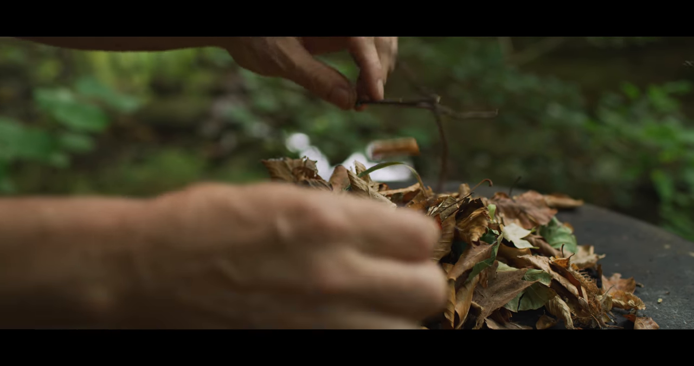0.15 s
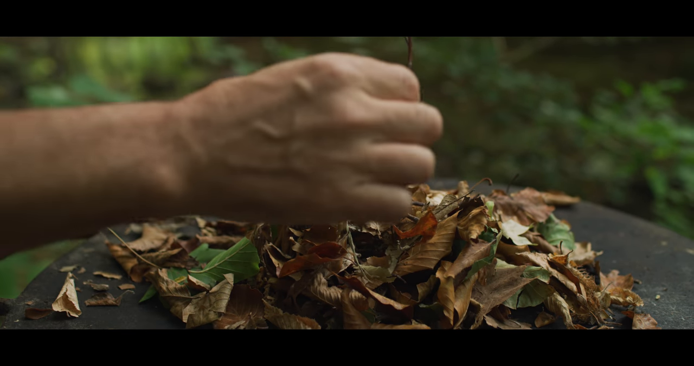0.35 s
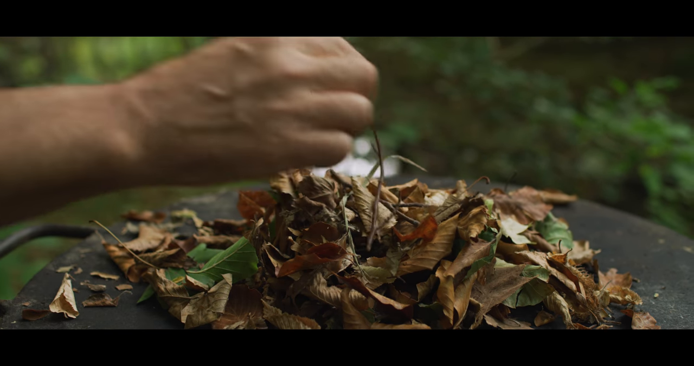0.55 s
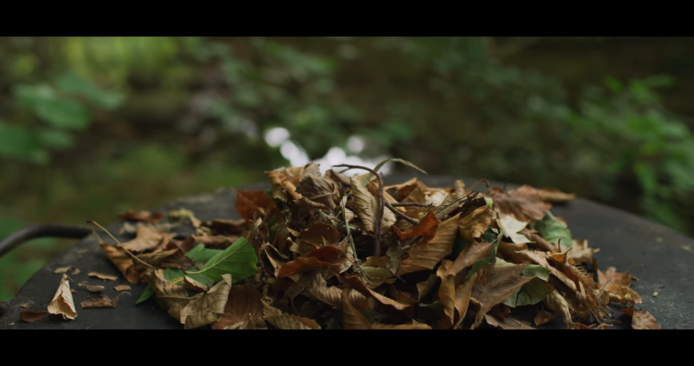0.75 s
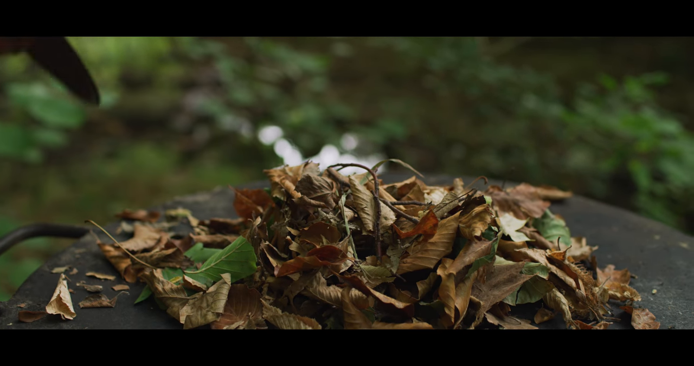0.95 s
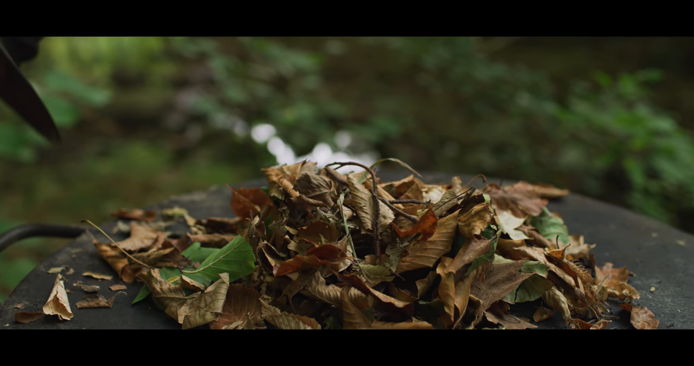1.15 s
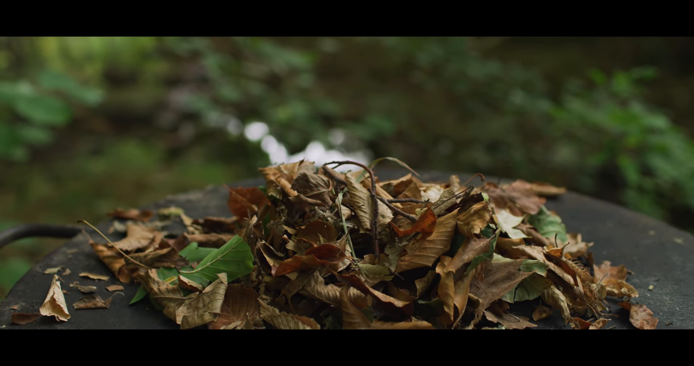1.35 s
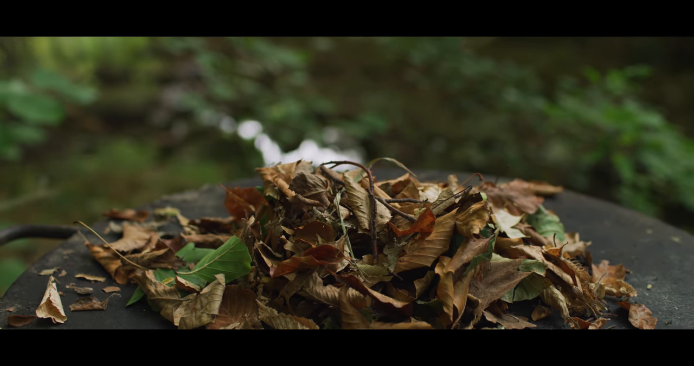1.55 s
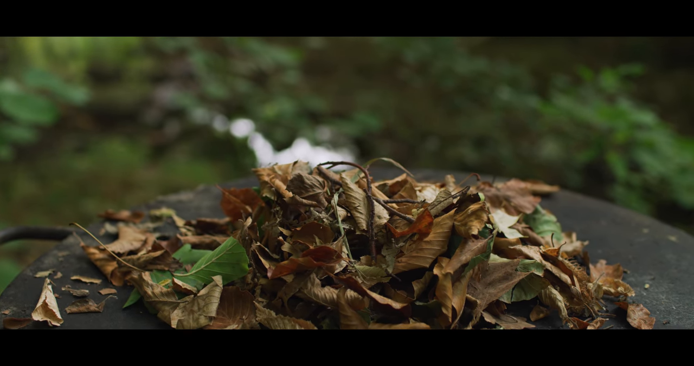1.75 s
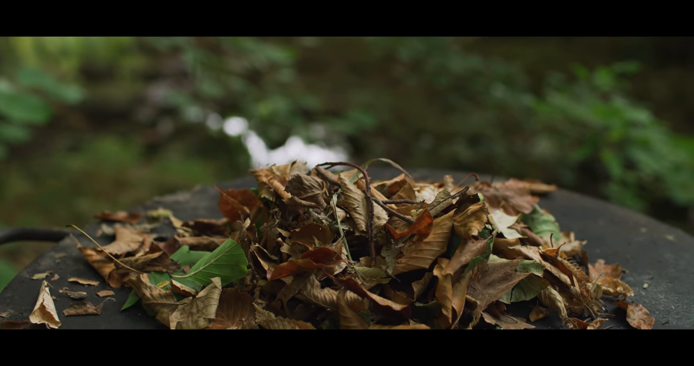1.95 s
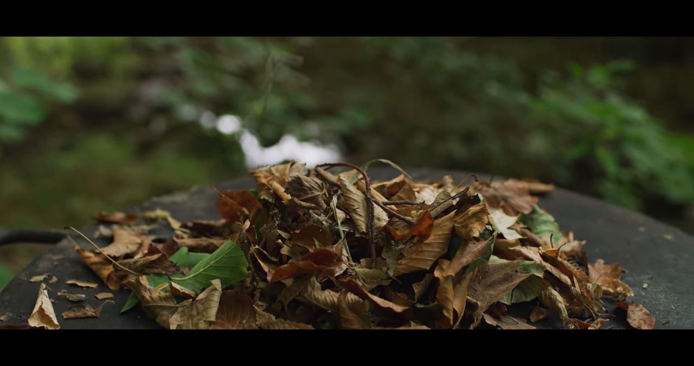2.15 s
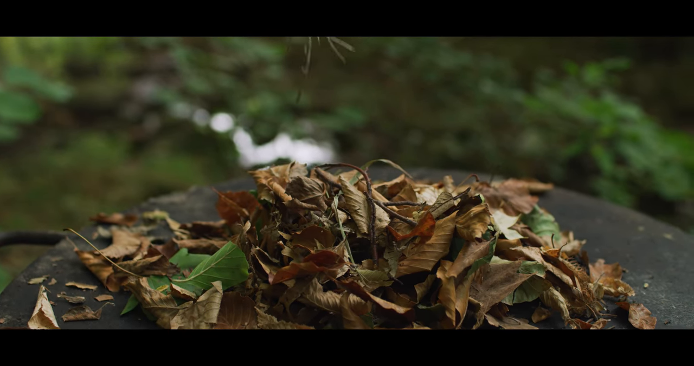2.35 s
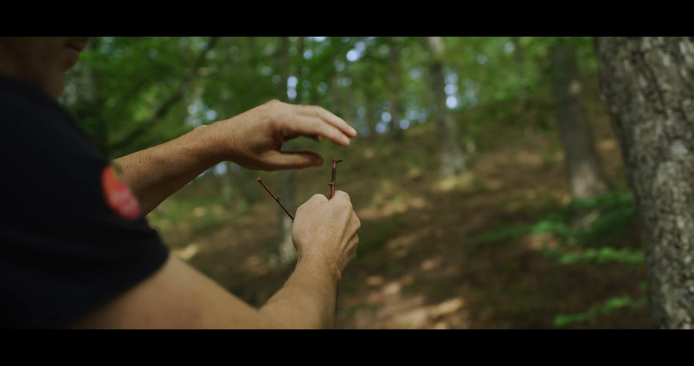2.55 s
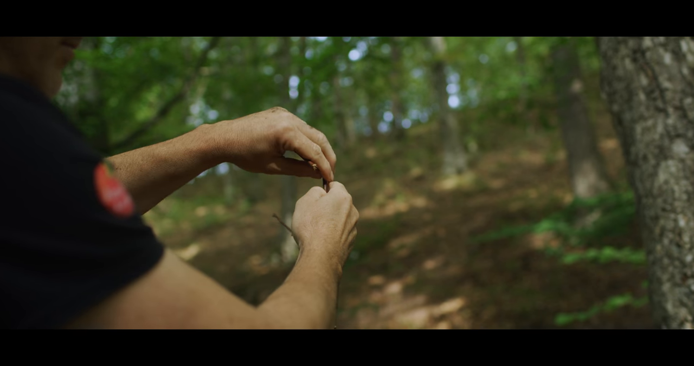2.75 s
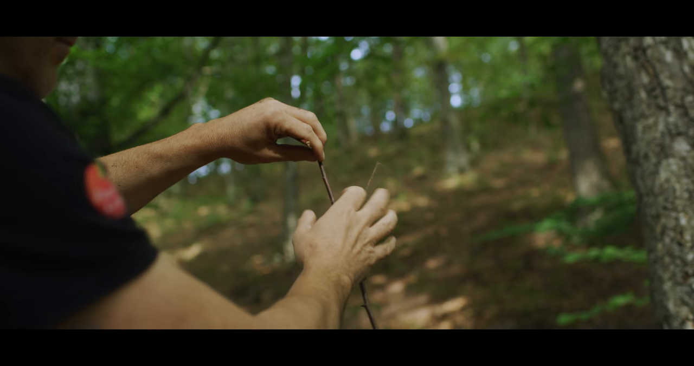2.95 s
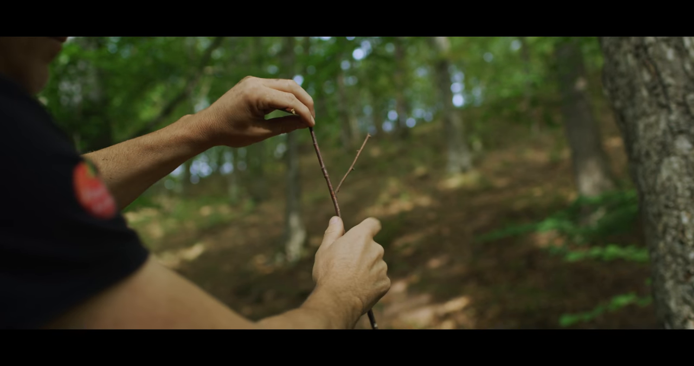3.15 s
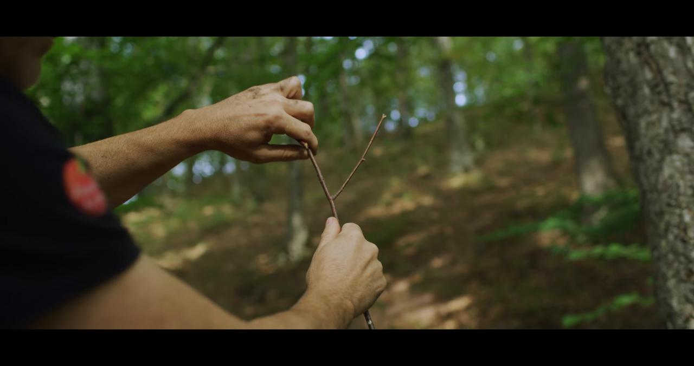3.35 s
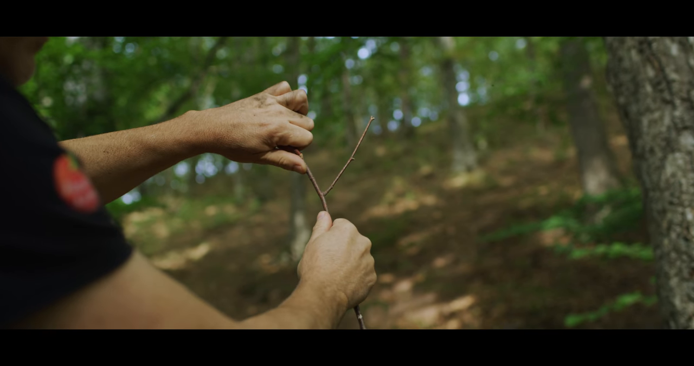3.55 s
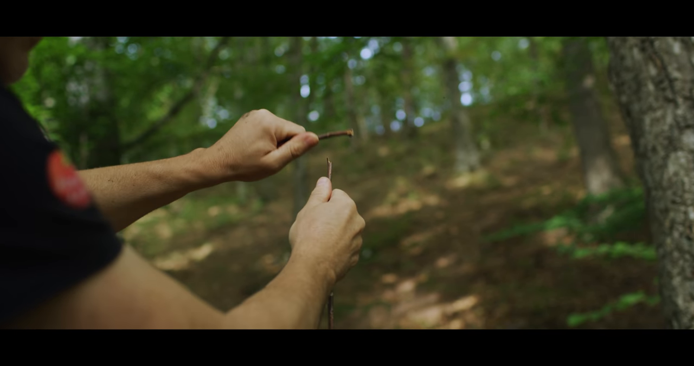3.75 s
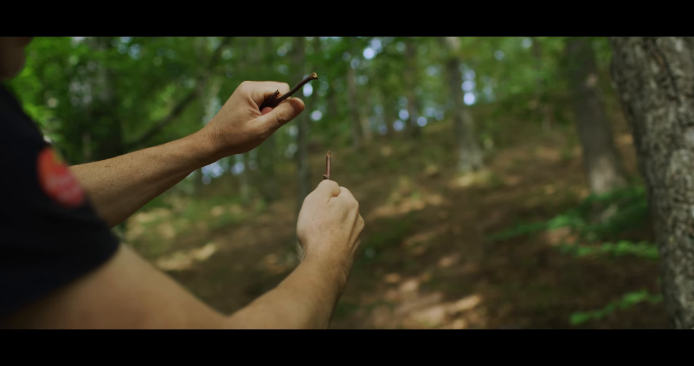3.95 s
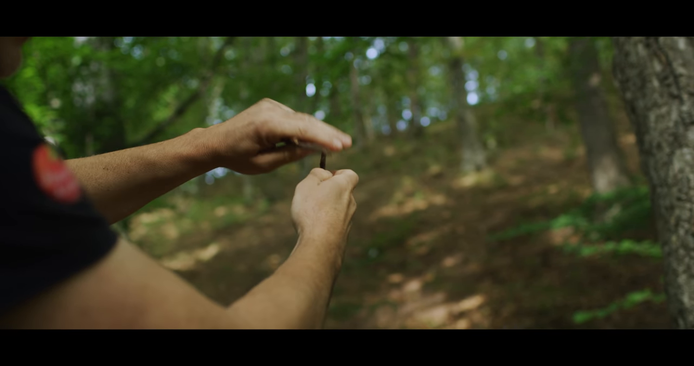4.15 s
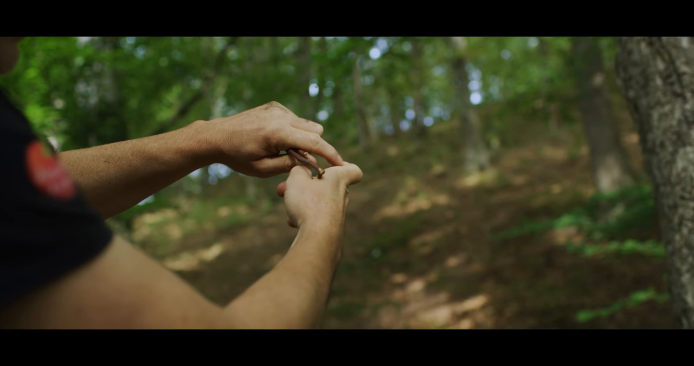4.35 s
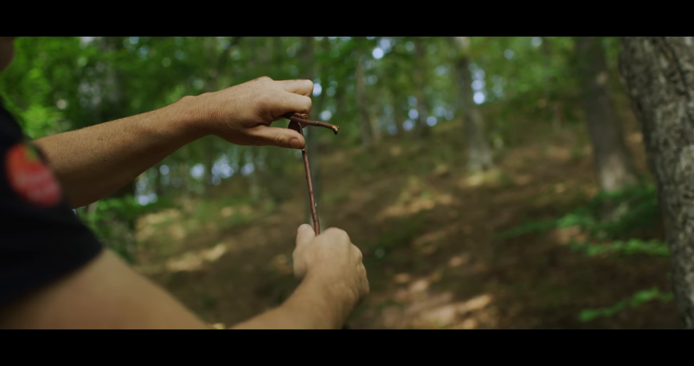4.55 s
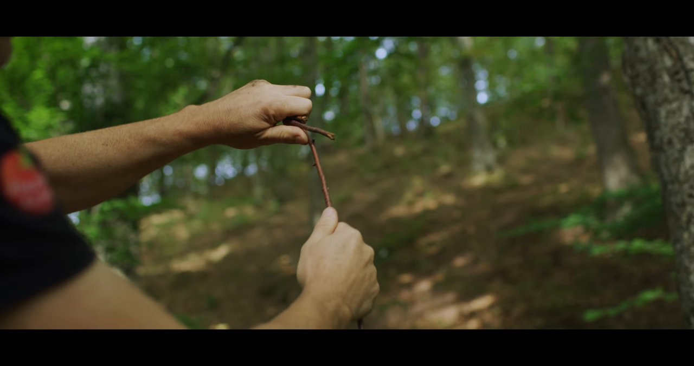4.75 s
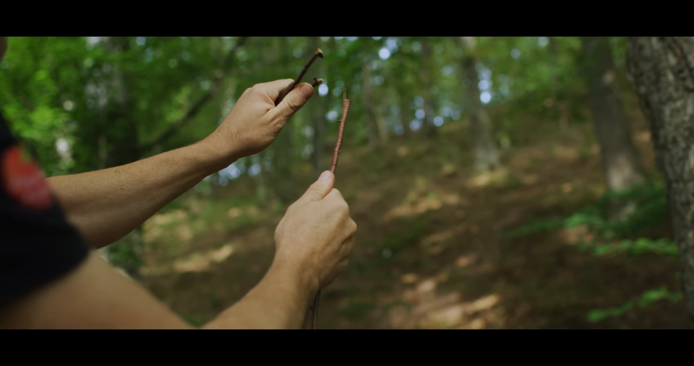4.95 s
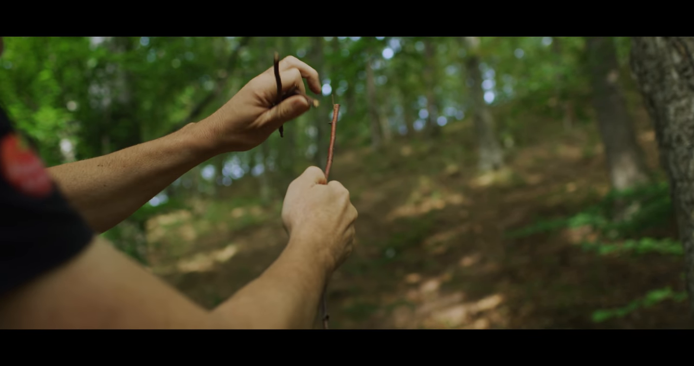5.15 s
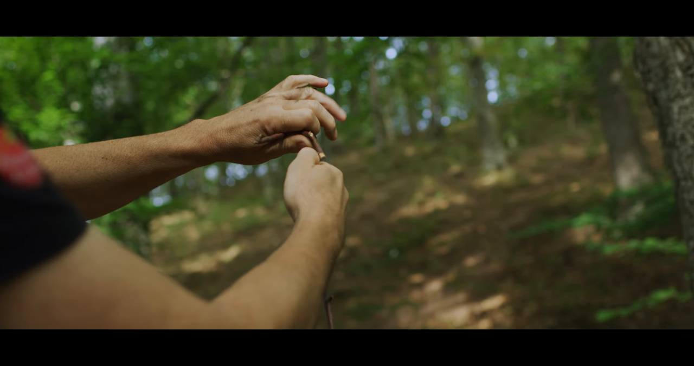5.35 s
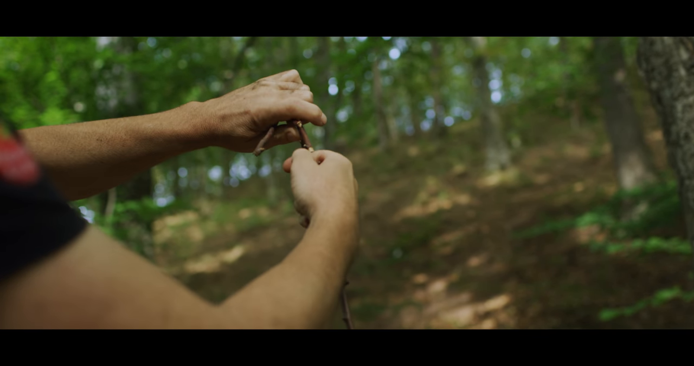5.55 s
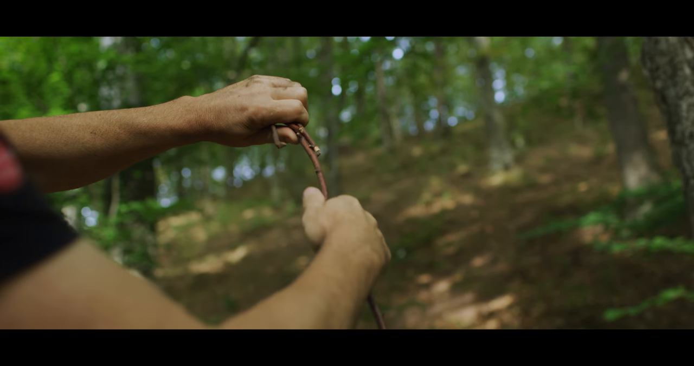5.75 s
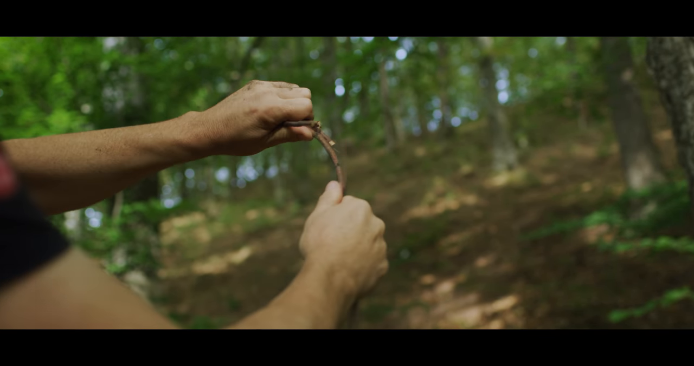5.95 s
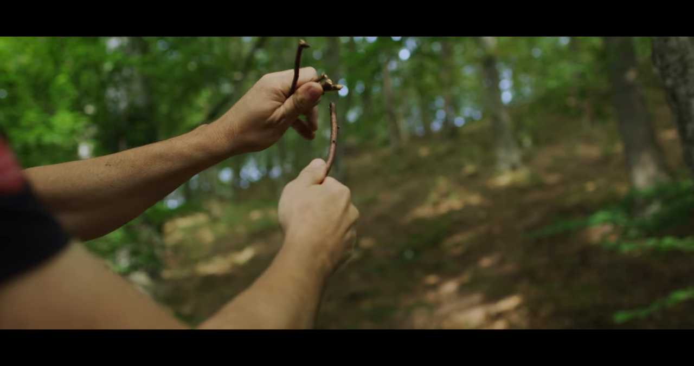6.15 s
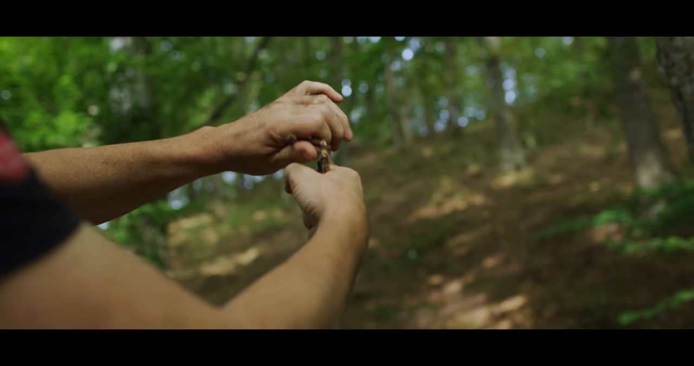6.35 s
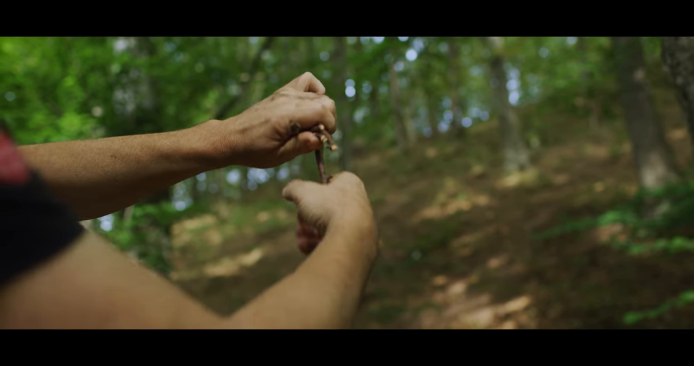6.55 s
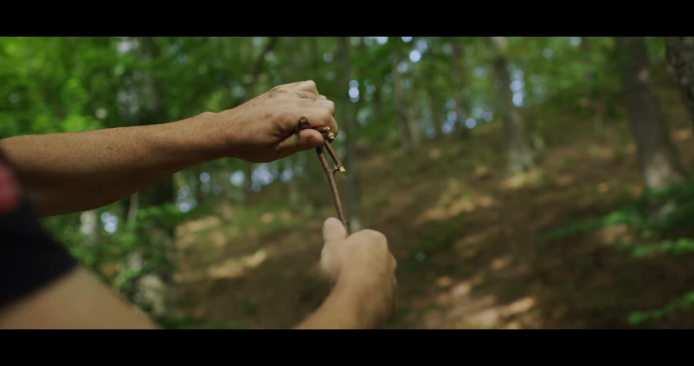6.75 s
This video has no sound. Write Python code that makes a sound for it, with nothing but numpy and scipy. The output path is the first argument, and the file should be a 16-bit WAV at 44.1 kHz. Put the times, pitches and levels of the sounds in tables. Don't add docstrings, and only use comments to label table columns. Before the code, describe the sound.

Hands rustle leaves and bark, then break five thin dry sticks with bright cracks, the last two loudest, amid birdsong and a fading river hush.

```python
import sys
import numpy as np
from scipy import signal
from scipy.fft import rfft, irfft
from scipy.io import wavfile
from scipy.ndimage import uniform_filter1d, map_coordinates

SR = 44100
rng = np.random.default_rng(int(sys.argv[2]) if len(sys.argv) > 2 else 0)


def gain_from_db(level_db):
    decades = np.asarray(level_db, float) / 20
    return 10 ** decades


def wrap_up_sound(samples):
    columns = np.atleast_2d(samples).T
    tamed = np.clip(columns, -1, 1)
    steps = np.round(tamed * 32767).astype(np.int16)
    wavfile.write(sys.argv[1], SR, steps)


N = 299880

# (frequency [Hz], level [dB per Hz])
RIVER_COLOUR = [(88, -33), (150, -7), (254, -12.5), (422, 0), (583, -4.5), (1280, -0.5), (2100, -6),
                (3830, -8.5), (6000, -11), (7800, -37.5), (13200, -120)]
# (frequency [Hz], level [dB per Hz])
AIR_COLOUR = [(15, -42), (25, 1), (76, -0.5), (309, -7.5), (394, -7), (545, -6.5), (754, -6), (1940, -8.5),
              (2840, -15), (4490, -18.5), (9840, -26.5), (14800, -32.5), (16000, -47)]
# (frequency [Hz], level [dB per Hz])
LEAF_COLOUR = [(2500, -36), (5000, 3), (8000, -5), (12000, -11), (16000, -15.5)]
# (middle [s], length [s], rustle [dB])
STIRS = [(0.602, 1.1, -74), (1.378, 1.5, -70), (2.007, 1.3, -70.5), (2.396, 0.57, -75), (4.207, 0.32, -75),
         (5.594, 0.74, -75), (6.075, 0.16, -64), (6.75, 0.52, -78)]
# (frequency [Hz], bandwidth [Hz], level [dB])
RUMBLE_HUMS = [(40.95, 9.14, -72), (51.3, 10, -63.5), (103.6, 11, -69.5)]
# (frequency [Hz], level [dB per Hz])
WIDTH_COLOUR = [(30, 2.5), (90, -5.5), (300, -14), (700, -1.5), (1700, -1.5), (2800, -22.5)]
# (middle [s], length [s], rise
# [dB])
CHORUS_SWELLS = [(.1, 0.93, 2.5), (.65, 0.5, 3.5), (1.32, 0.74, 5.5), (2.7, 0.53, 2), (3.85, .4, 1),
                 (4.2, 0.25, 0.5), (4.83, 0.18, 3), (5.51, 0.17, 1.5), (6.16, 0.42, 4), (6.8, 0.33, 3)]
# (start [s], length [s], first pitch [Hz], last pitch [Hz], level [dB])
GLIDES = [(.115, .02, 4050, 4750, -56), (.133, .035, 4700, 5450, -53), (.163, .02, 5300, 6600, -54),
          (1.84, .02, 4470, 5550, -57), (2.525, .09, 4020, 3700, -63), (2.63, .035, 4700, 3600, -60),
          (2.66, .05, 3550, 4200, -64), (2.82, .07, 3800, 4900, -68), (3.125, .022, 4700, 5530, -59),
          (3.51, .035, 4550, 3700, -58), (3.55, .03, 3100, 3680, -63), (3.585, .03, 2850, 3160, -62),
          (3.805, .022, 4500, 5400, -60), (4.125, .045, 4290, 4700, -66), (4.19, .02, 7500, 7950, -60),
          (4.21, .075, 7800, 7780, -66), (4.29, .02, 7550, 8000, -61), (5.655, .045, 4450, 4050, -58),
          (6.39, .065, 6150, 5800, -62), (6.565, .025, 6100, 6290, -59), (6.675, .055, 6380, 3990, -55)]
# (start [s], length [s], pitch [Hz], level [dB])
PIPES = [
    (.19, .14, 2565, -66),
    (3.11, .22, 2165, -66),
]
# (start [s], lower voice [dB], upper voice [dB], upper voice pitch [ratio])
NEAR_CALLS = [(0.259, -45.5, -49, 1.01), (1.101, -46.5, -50, .995), (1.934, -47.5, -50, .98),
              (3.226, -44, -50, 1.005), (4.642, -43.5, -52, .995), (5.503, -43.5, -51.5, .985),
              (6.584, -44, -50, .97)]
# (time after start [s], lower voice [Hz], upper voice [Hz], effort [dB])
CALL_SHAPE = [
    (0, 2900, 5650, -14),
    (.008, 3800, 6600, -9),
    (.014, 4200, 7150, -4),
    (.022, 4370, 7480, 0),
    (.038, 4290, 7000, 0),
    (.05, 4220, 6970, -5),
    (.058, 4330, 7200, -2),
    (.062, 3600, 6600, -13),
    (.068, 2300, 5400, -19),
]
# (times lower [count], times upper [count], level [dB])
CALL_MIXED = [
    (1, 1, -15),
    (-1, 1, -17),
    (2, 0, -23),
]
# (start [s], level [dB])
CHIPS = [(0.718, -62.5), (4.369, -63), (6.2, -64)]
# (time after start [s], lower voice [Hz], upper voice [Hz], effort [dB])
CHIP_SHAPE = [
    (0, 4680, 4980, 18),
    (.004, 3725, 5280, 15),
    (.021, 3670, 5120, 8),
    (.025, 4100, 4700, 18),
    (.029, 4020, 4270, -14),
]
# (times lower [count], times upper [count], level [dB])
CHIP_MIXED = [
    (-2, 2, -8),
    (.5, .5, -7),
]
# (start [s], length [s], edge pitch [Hz], top pitch [Hz], level [dB])
ARCHES = [(1.869, 0.032, 3930, 4850, -54), (2.598, 0.041, 2750, 3180, -60),
          (3.149, 0.092, 4100, 4430, -58.5), (3.947, 0.061, 7400, 9100, -67),
          (4.062, 0.045, 7160, 9250, -67)]
# (start [s], length [s], first pitch [Hz], last pitch [Hz], level [dB])
DROPS = [(6.335, .033, 7900, 6100, -64), (6.51, 0.045, 8070, 6600, -62.5)]
# (time [s], peak [dB], ring [Hz])
RUBS = [(0.241, -46, 6420), (0.6002, -46, 6000), (0.665, -40, 7320), (1.2054, -42, 6480),
        (1.2444, -44, 6200), (1.2862, -42, 12900), (1.356, -44, 8140), (1.3876, -42, 6320),
        (1.4244, -45, 7520), (1.4676, -42, 6130), (1.5828, -50, 6040), (1.718, -47, 6780),
        (2.0702, -49.5, 6870), (2.6242, -44, 7720), (2.9253, -42.5, 6340), (2.9765, -46, 8700),
        (3.4295, -50, 10200), (3.5006, -49, 7190), (3.851, -43.5, 6000), (4.046, -42.5, 7040),
        (4.3183, -46, 6360), (5.1084, -42.5, 6040), (5.1774, -45.5, 9900), (5.3995, -37.5, 8360),
        (5.432, -42, 6190), (5.691, -44, 6400), (6.27, -43.5, 6330), (6.2997, -41.5, 9160),
        (6.4182, -41.5, 11000), (6.5588, -47, 6110)]
# (time [s], level [dB], length [s])
SCUFFS = [(0.3, -50.5, 0.064), (0.598, -46, 0.026), (0.657, -50.5, 0.016), (1.087, -52.5, 0.017),
          (1.2, -51, 0.028), (1.26, -50.5, 0.018), (1.58, -47, 0.013), (1.616, -51, 0.0095),
          (1.958, -47, 0.039), (2.056, -71, 0.029), (2.348, -60, 0.029), (2.55, -60, 0.022),
          (2.915, -56, 0.05)]
# (time [s], tearing [dB], tearing t60 [s], unringing share [dB], jolt in the hands [dB])
BREAKS = [
    (2.1524, 0.5, 0.0048, -12, -20),
    (2.2459, -11, 0.0037, -15, -28.5),
    (3.6768, 0, 0.0035, -12, -26),
    (4.8730, 10, 0.0042, -19.5, -26),
    (6.013, 10.5, 0.0067, -10.5, -18),
]
# (frequency [Hz], bandwidth [Hz], level [dB])
PIECE_1 = [(2560, 510, -17.5), (4490, 220, 0.5), (5780, 280, -4.5), (6710, 220, -9.5), (7800, 250, -13),
           (8440, 570, -10.5), (10300, 270, 7.5), (12000, 490, 5), (12500, 240, -11), (13600, 830, -5),
           (15100, 190, -10.5), (15500, 380, -16)]
PIECE_2 = [(3920, 240, -16), (4970, 100, 1), (6320, 1400, -7), (8750, 810, 5.5), (13000, 1040, -20)]
PIECE_3 = [(1307, 430, -9), (4360, 87, -12.5), (5460, 580, -5.5), (7100, 120, -5), (7270, 310, -6),
           (8350, 260, -3), (9460, 600, 4), (10200, 550, -1.5), (11600, 220, -20), (12500, 380, -5),
           (14200, 240, -9), (15980, 410, -10)]
PIECE_4 = [(2660, 510, -26), (3290, 83, -18), (4334, 290, 0), (5360, 290, -5.5), (6600, 390, -8),
           (7870, 930, -7.5), (8400, 260, -13), (9430, 320, -18), (9530, 220, -15), (11000, 220, -18.5),
           (12700, 290, -16.5), (14900, 390, -23)]
PIECE_5 = [(2780, 680, -11.5), (4750, 220, 1.5), (5940, 680, -1), (7085, 300, -0.5), (7795, 340, -1.5),
           (8580, 890, -6.5), (9150, 800, -11), (10500, 600, -3.5), (11840, 130, -14), (12540, 620, -4),
           (14700, 130, -17), (14700, 490, -9.5)]
THUMPS_HZ = [420, 700, 810, 630, 276]
GROUND_DB = [-25, -15, -14, -18, -16.5]
# (time [s], peak [dB], ring [Hz], t60 [s])
FIBRES = [(3.641, -51, 9000, 0.0055), (3.65, -45, 14000, 0.0064), (3.661, -29.5, 8970, 0.0048),
          (4.8189, -12, 10200, 0.0026), (4.8228, -18, 7500, 0.0045), (4.8506, -10, 9160, 0.001),
          (5.8525, -24, 7800, 0.004), (5.9525, -42, 9100, 0.0067), (5.960, -33, 10900, 0.0029),
          (5.9662, -30, 11600, 0.0035), (5.9745, -16.5, 13800, 0.0049), (5.9778, -48, 12100, .003),
          (5.983, -44, 12000, 0.0033), (5.9931, -13, 9000, 0.00203), (5.9988, -20.5, 12500, 0.0036),
          (6.0082, -9, 8960, 0.001), (6.1555, -32.5, 10100, 0.0093), (6.4295, -37, 5950, 0.0054),
          (6.5045, -33, 5000, 0.0036), (5.3935, -45, 12000, .004), (5.931, -44, 11000, .004)]

RIVER_NEAR_DB, RIVER_FAR_DB, TURN_START_S, TURN_END_S = -54, -64, 2.48, 3.02
AIR_DB, STILL_LEAVES_DB, CHORUS_DB = -58.5, -80.5, -60
CRACKLES_PER_S, CRACKLE_SHARE = 270, 0.38
LEAD_DB, LEAD_S, OVERTONE_DB = 13, 0.0096, -31.5
TREES_T60_S, RUB_T60_S = 0.19, 0.026
CRACK_OVER_TEARING, RING_WIDENING = 5, 1.3
KNOCK_HZ = 1550
GROUND_ECHO_S, GROUND_SMEAR_S, FLAT_GROUND = 0.0059, 0.015, 5.6


def rms_one(x):
    return x / np.sqrt(np.mean(x ** 2) + 1e-20)


def drift(rate_hz, size=N):
    knots = rng.standard_normal(size // 40 + 4)
    return rms_one(map_coordinates(knots, [np.arange(size) / SR * rate_hz + 1], order=1))


def resonate(x, hz, width_hz):
    r = np.exp(-np.pi * width_hz / SR)
    feedback = [1, -2 * r * np.cos(2 * np.pi * hz / SR), r * r]
    return signal.lfilter([(1 - r * r) / 2, 0, (r * r - 1) / 2], feedback, x)


def cut(x, hz, kind, order=2):
    return signal.sosfilt(signal.butter(order, hz, kind, fs=SR, output="sos"), x)


def add(track, s, sound):
    i = round(s * SR)
    track[i:i + len(sound)] += sound[:N - i]


def dying(t60, size):
    return rng.standard_normal(size) * gain_from_db(-60 * np.arange(size) / SR / t60)


def evened(burst):
    spectrum = rfft(burst)
    power = uniform_filter1d(abs(spectrum) ** 2, size=15)
    return irfft(spectrum / np.sqrt(power), len(burst))


def bumps(rows):
    t = np.arange(N) / SR
    return sum(height * np.cos(np.pi * np.clip((t - s) / length, -.5, .5)) ** 2 for s, length, height in rows)


def hiss(spectrum, patchy_db):
    hz, db = np.transpose(spectrum)
    log_hz = np.log(np.fft.rfftfreq(N, 1 / SR) + 1)
    colour = rfft(rng.standard_normal(N)) * gain_from_db(np.interp(log_hz, np.log(hz), db))
    region = np.interp(log_hz, np.log(hz[[0, -1]]), [0, 2])
    together = drift(12.0)
    total = np.zeros(N)
    for k in range(3):
        band = irfft(colour * np.clip(1 - abs(region - k), 0, 1), N)
        total += band * gain_from_db(patchy_db * (1.6 * together + drift(17.0)))
    return rms_one(total)


def scatter(x, t60, start_s, alike):
    mid, side = (dying(t60, size=SR // 2) for k in range(2))
    tails = np.array([mid + (1 - alike) * side, mid - (1 - alike) * side])
    late = np.pad(x, (round(start_s * SR), 0))[:N]
    return signal.fftconvolve(late[None], tails / np.sqrt(np.sum(mid ** 2)), axes=1)[:, :N]


def river():
    born = rng.random(N) < 700 / SR * gain_from_db(4.0 * drift(9.0))
    sizes = gain_from_db(2.0 * np.minimum(rng.exponential(1, N), 4)) * rng.choice([-1, 1], N) * born
    dealt = rng.integers(0, 12, N)
    bubbles = np.zeros(N)
    for k, hz in enumerate(np.geomspace(300, 2600, 12)):
        bubbles += resonate(sizes * (dealt == k) + 1e-18, hz, hz / 7.0)
    level_db = np.interp(np.arange(N) / SR, [TURN_START_S, TURN_END_S], [RIVER_NEAR_DB, RIVER_FAR_DB])
    return gain_from_db(level_db) * rms_one(hiss(RIVER_COLOUR, 1.3) + .6 * rms_one(bubbles))


def air():
    return gain_from_db(AIR_DB) * cut(hiss(AIR_COLOUR, 0.93), 34, "high")


def leaves():
    born = rng.random(N) < CRACKLES_PER_S / SR * gain_from_db(6.0 * drift(11.0))
    sizes = gain_from_db(3.0 * np.minimum(rng.exponential(1, N), 4)) * born
    crackle = signal.lfilter([1], [1, -.985], sizes) * rng.standard_normal(N)
    crackle = rms_one(cut(crackle, [5500, 14500], "band"))
    rustle = rms_one(hiss(LEAF_COLOUR, 1.8) + CRACKLE_SHARE * crackle)
    stirred = gain_from_db(STILL_LEAVES_DB) + bumps([(s, length, gain_from_db(db)) for s, length, db in STIRS])
    return gain_from_db(6.5) * stirred * rustle


def rumble():
    out = np.zeros(N)
    for hz, width, db in RUMBLE_HUMS:
        hum = resonate(resonate(rng.standard_normal(N), hz, width), hz, width)
        out += gain_from_db(db) * rms_one(hum)
    return out


def width_hiss():
    return gain_from_db(-81.5) * cut(hiss(WIDTH_COLOUR, .8), 40, "high") * [[1], [-1]]


def chorus(count=400):
    notes = np.zeros(N)
    for s, pitch, glide, length, level in rng.random((count, 5)):
        t = np.arange(0, .02 + 0.089 * length, 1 / SR)
        hz = 3100 + 2500 * pitch + 1500 * (glide - .5) * t / t[-1]
        note = np.hanning(len(t)) * np.sin(2 * np.pi * np.cumsum(hz) / SR)
        add(notes, s * N / SR, gain_from_db(16 * level) * note)
    blurred = rms_one(scatter(notes, t60=0.34, start_s=0, alike=.45))
    haze = [(1500, -32.5), (2600, -9), (4200, -2.0), (6000, -9), (9000, -16.0), (14000, -31)]
    mid, side = (hiss(haze, 0.75) for k in range(2))
    level_db = CHORUS_DB + bumps(CHORUS_SWELLS) + 1.9
    return gain_from_db(level_db) * rms_one(0.53 * blurred + mid + 0.51 * side * [[1], [-1]])


def whistle(length, hz_of, db, fade_db=0, flicker_db=3.0, unsteady=0.012):
    share = np.arange(0, length, 1 / SR) / length
    level_db = db + fade_db * (share - .5) + flicker_db * drift(61.0, size=len(share))
    window = signal.windows.tukey(len(share), .25)
    hz = hz_of(share) * (1 + unsteady * drift(256.0, size=len(share)))
    return np.sqrt(2) * gain_from_db(level_db) * window * np.sin(2 * np.pi * np.cumsum(hz) / SR)


def whistlers():
    out = np.zeros(N)
    for s, length, first, last, db in GLIDES:
        add(out, s, whistle(length, lambda share: first + (last - first) * share, db))
    for s, length, hz, db in PIPES:
        steady = lambda share: np.full_like(share, hz)
        add(out, s, whistle(length, steady, db, fade_db=-7, flicker_db=2.5, unsteady=.002))
    for s, length, edge, top, db in ARCHES:
        arch = lambda share: edge + (top - edge) * np.sin(np.pi * share ** 1.8) ** 0.72
        add(out, s, whistle(length, arch, db, fade_db=-8))
    for s, length, first, last, db in DROPS:
        add(out, s, whistle(length, lambda share: first + (last - first) * share ** 2.2, db))
    return out


def path(rows):
    s, *columns = np.transpose(rows)
    t = np.arange(s[0], s[-1], 1 / SR)
    return [np.interp(t, s, c) for c in columns] + [signal.windows.tukey(len(t), .15)]


def two_voices(shape, low_db, high_db, mixed, lead_db=0, ratio=1):
    low_hz, high_hz, effort_db, window = path(shape)
    size = len(window)
    wobble = lambda share: 1 + share * drift(300.0, size=size)
    low = 2 * np.pi * np.cumsum(low_hz * wobble(.01)) / SR
    high = 2 * np.pi * np.cumsum(ratio * high_hz * wobble(.013)) / SR
    lead_db = lead_db * np.exp(-(np.arange(size) / SR / LEAD_S) ** 2)
    tones = gain_from_db(low_db) * np.sin(low) + gain_from_db(high_db + lead_db) * np.sin(high)
    tones += gain_from_db(high_db + OVERTONE_DB + 3.0 * lead_db) * np.sin(2 * high)
    for a, b, db in mixed:
        tones += gain_from_db((low_db + high_db) / 2 + db) * np.sin(a * low + b * high)
    breath = cut(rng.standard_normal(size), [2800, 8500], "band")
    tones += gain_from_db(low_db - 11.0) * breath
    return np.sqrt(2) * tones * gain_from_db(effort_db + 2.9 * drift(110.0, size=size)) * window


def near_bird():
    out = np.zeros(N)
    for s, low_db, high_db, ratio in NEAR_CALLS:
        add(out, s, two_voices(CALL_SHAPE, low_db, high_db, CALL_MIXED, LEAD_DB, ratio))
        puff = resonate(resonate(rng.standard_normal(500), 4460, 1000), 4460, 1000) * np.hanning(500)
        add(out, s - .009, gain_from_db(low_db + 7) * puff)
    return out


def chipping_bird():
    out = np.zeros(N)
    for s, db in CHIPS:
        add(out, s, two_voices(CHIP_SHAPE, db, db - 6.5, CHIP_MIXED))
    return out


def birds():
    others = whistlers() + chipping_bird()
    near = near_bird()
    left = gain_from_db(3.0) * near + gain_from_db(2.5) * others
    right = gain_from_db(-4.5) * np.roll(near, 1) + gain_from_db(-4.0) * np.roll(others, 1)
    into_trees = gain_from_db(1.5) * near + gain_from_db(-2.0) * others
    return np.array([left, right]) + scatter(into_trees, t60=TREES_T60_S, start_s=.003, alike=0.53)


def ticks(rows, broad_db, low_hz):
    out = np.zeros(N)
    for s, db, hz, t60 in rows:
        burst = evened(dying(t60, size=1500))[:1200]
        sound = resonate(burst, hz, 0.34 * hz) + gain_from_db(broad_db) * cut(burst, low_hz, "high")
        add(out, s, gain_from_db(db) * sound / abs(sound).max())
    return out


def rubs():
    return ticks([(s, db, hz, RUB_T60_S) for s, db, hz in RUBS], broad_db=-3.5, low_hz=3500)


def scuffs():
    out = np.zeros(N)
    for s, db, length in SCUFFS:
        puff = cut(rng.standard_normal(4000), [400, 2500], "band", order=1)[:round(length * SR)]
        add(out, s, gain_from_db(db + 12.0) * puff * np.hanning(len(puff)))
    return out


def ring_piece(x, piece, bare_db):
    ringing = sum(gain_from_db(db) * resonate(x, hz, RING_WIDENING * width) for hz, width, db in piece)
    return ringing, gain_from_db(bare_db) * cut(x, [3200, 15000], "band")


def breaks():
    out, bare, below = np.zeros((3, N))
    t = np.arange(1500) / SR
    crack = 1. * (t == 0)
    pieces = [PIECE_1, PIECE_2, PIECE_3, PIECE_4, PIECE_5]
    for row, thump_hz, ground_db, piece in zip(BREAKS, THUMPS_HZ, GROUND_DB, pieces):
        s, db, t60, bare_db, thump_db = row
        burst = rng.standard_normal(1500) + CRACK_OVER_TEARING * crack
        tearing = evened(burst * gain_from_db(-60 * (t / t60) ** 1.12)) * (t < .02)
        ringing, unringing = ring_piece(tearing, piece, bare_db)
        sound = 0.78 * ringing + unringing
        gain = gain_from_db(db) / abs(sound).max()
        add(out, s, gain * sound)
        add(below, s + GROUND_ECHO_S, gain_from_db(ground_db) * gain * sound)
        ringing, unringing = ring_piece(crack, piece, bare_db)
        add(bare, s, gain * (0.11 * ringing + unringing))
        thump = resonate(crack, thump_hz, 0.41 * thump_hz)
        thump += .9 * resonate(crack, KNOCK_HZ, 600)
        thump += 0.162 * cut(crack, [60, 1300], "band", order=1)
        add(out, s + 0.0012, gain_from_db(thump_db) * thump / abs(thump).max())
    return out, bare, below


def ground_echo(below):
    litter = evened(dying(GROUND_SMEAR_S, size=1500) + FLAT_GROUND * (np.arange(1500) == 0))
    smeared = np.convolve(below, litter / np.sqrt(np.sum(litter ** 2)))[:N]
    return cut(smeared, 7500, "low", order=1)


def fibres():
    return ticks(FIBRES, broad_db=-10.5, low_hz=3550)


def twigs():
    small = rubs()
    soft = scuffs()
    snaps, bare, below = breaks()
    small = small + fibres()
    source = bare + small
    near = scatter(source, t60=0.057, start_s=0.0032, alike=1.0)
    far = scatter(cut(source, [2000, 9000], "band", order=1), t60=.45, start_s=.01, alike=.8)
    return snaps + small + soft + ground_echo(below) + gain_from_db(-14.5) * near + gain_from_db(-19.5) * far


def scene():
    centre = river() + air() + leaves() + rumble()
    return centre + width_hiss() + chorus() + birds() + twigs()


def roll_off(x):
    return signal.sosfilt(signal.butter(12, 16480, fs=SR, output="sos"), x)


def record(dry):
    top_cut = signal.sosfilt(signal.cheby2(10, 40, 16350, fs=SR, output="sos"), dry)
    return roll_off(np.clip(top_cut, -1, 1))


dry = scene()
out = record(dry)
wrap_up_sound(out)
```